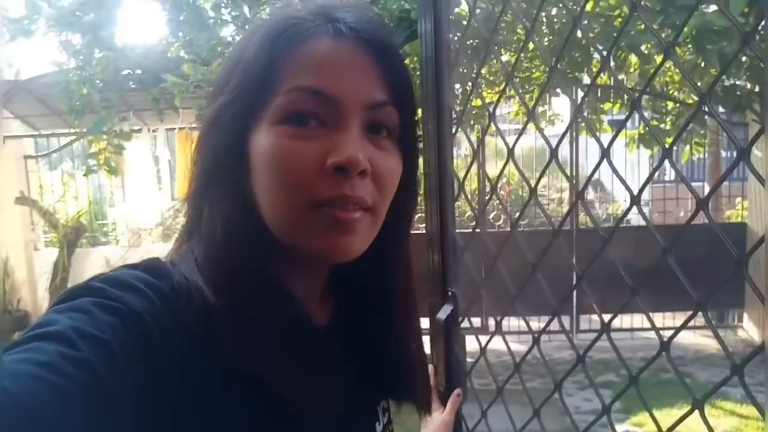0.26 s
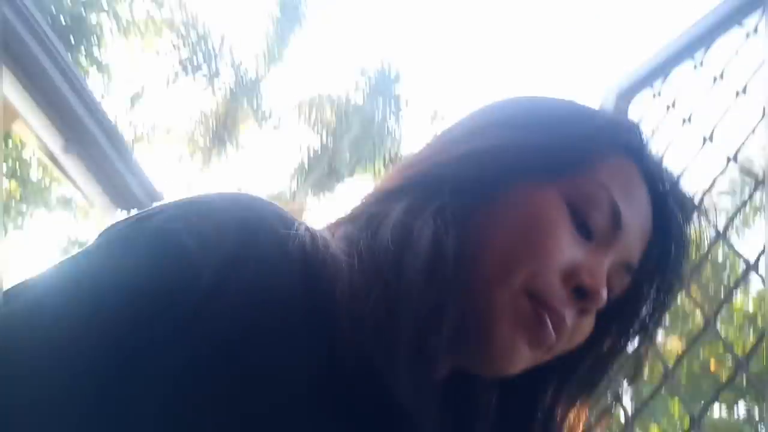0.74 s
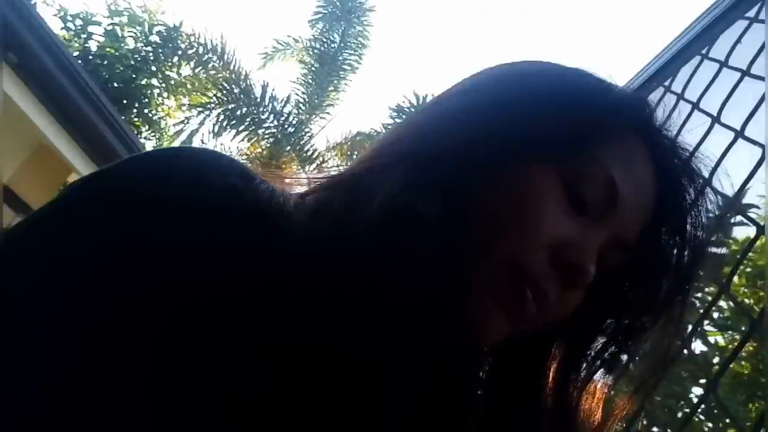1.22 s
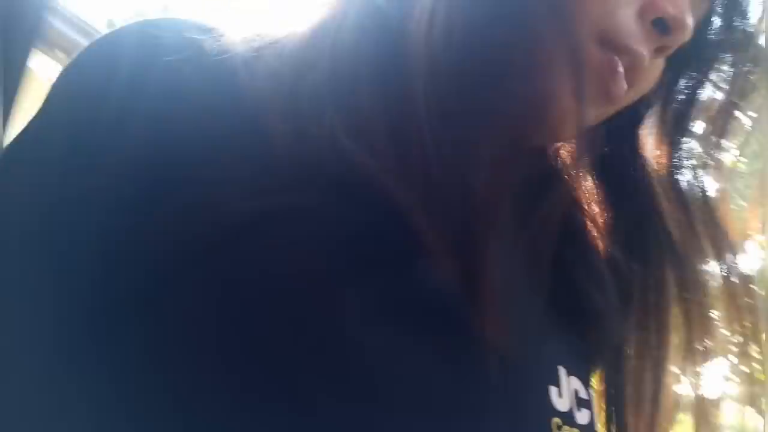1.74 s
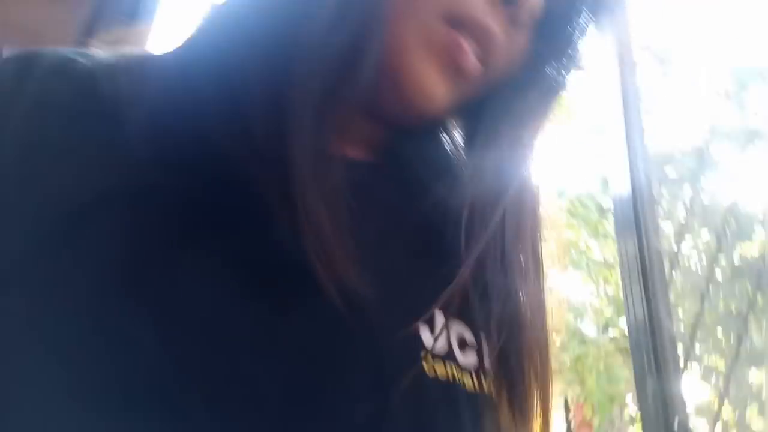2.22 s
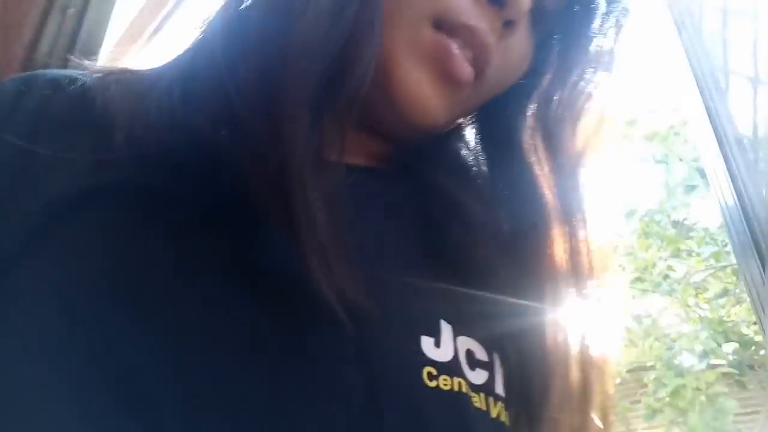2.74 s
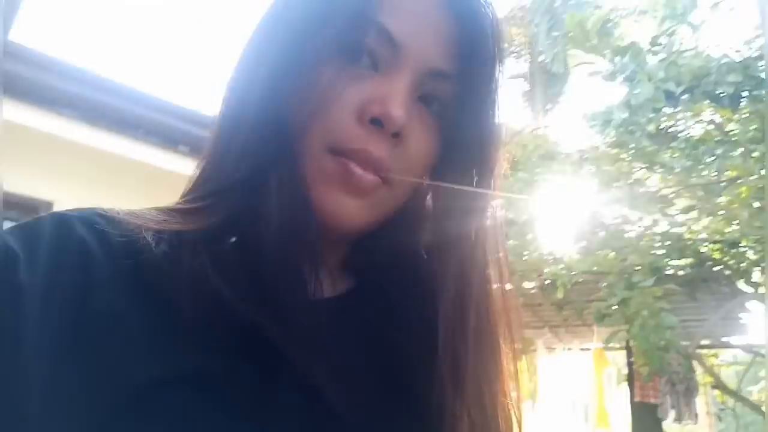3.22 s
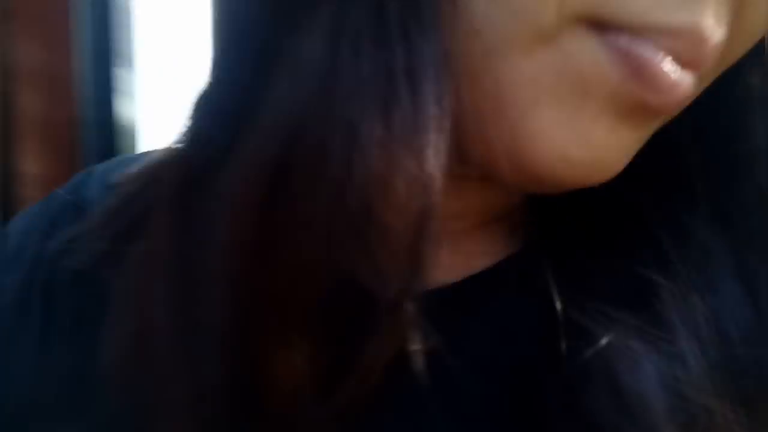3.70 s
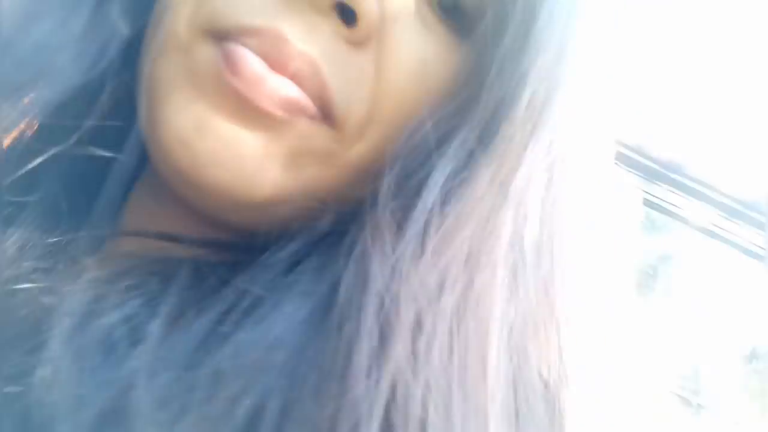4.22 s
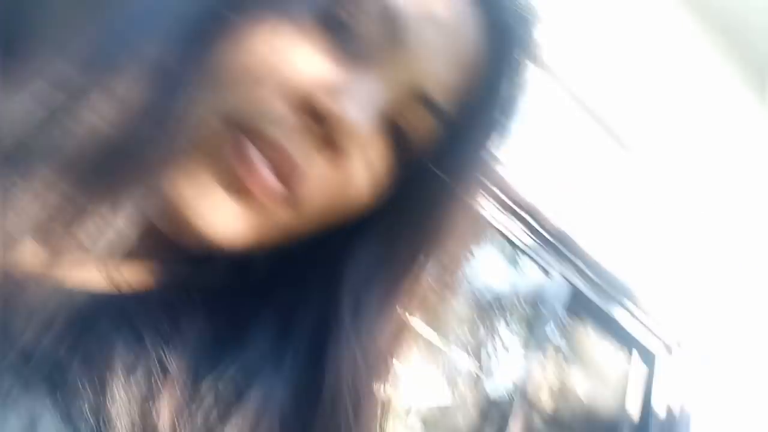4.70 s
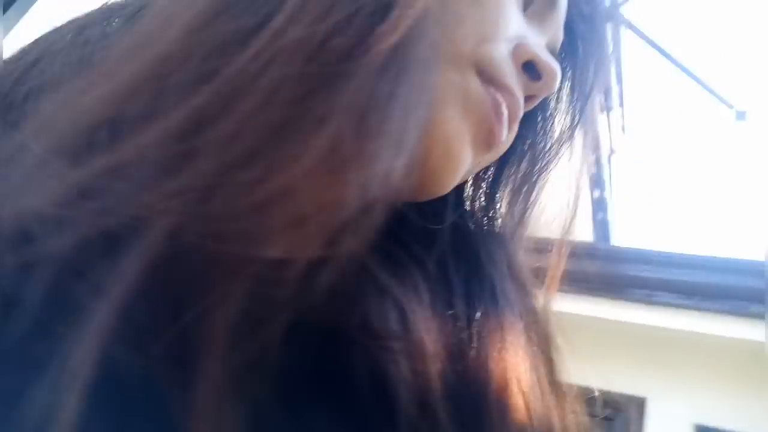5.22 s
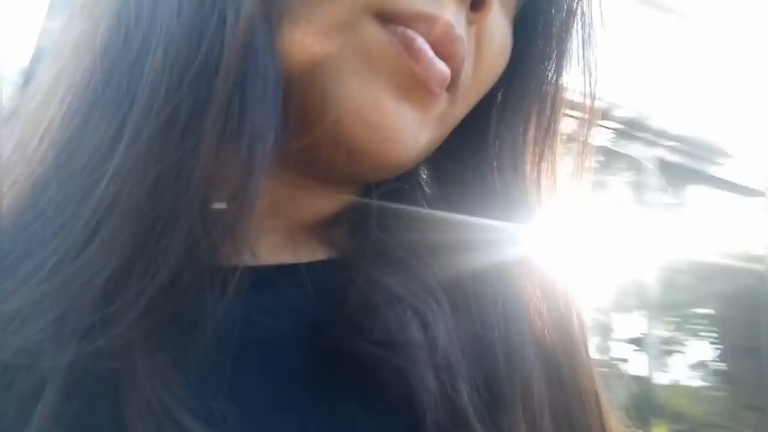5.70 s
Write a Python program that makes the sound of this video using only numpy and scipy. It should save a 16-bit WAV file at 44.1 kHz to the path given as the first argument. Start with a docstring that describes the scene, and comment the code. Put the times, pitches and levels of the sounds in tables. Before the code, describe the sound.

In a yard, a sleeve rubs close to a handheld phone and a hinge gives a thin, high squeak. A steel mesh gate then swings open with a loud, piercing squeal and ringing knocks of latch and frame. More squeals follow, fraying into rasps, and then shorter squeaks and clanks. Fingers tick sharply on the microphone, mostly on the left, over a faint low outdoor rumble.

```python
"""A yard, where someone holding a phone swings a steel mesh gate open.
Dry hinges stick and slip, squealing in near-pure tones that break up into rasps; latch and frame knock,
ring and hum, with a short echo off wall and paving. Up close, sleeve and hair rub and fingers tick on
the left microphone, over a low outdoor rumble. The phone's crude rate converter mirrors every squeal."""
import sys
import numpy as np
from scipy import signal
from scipy.fft import rfft, irfft, next_fast_len
from scipy.io import wavfile
from scipy.ndimage import map_coordinates

SR = 44100
rng = np.random.default_rng(int(sys.argv[2]) if len(sys.argv) > 2 else 0)


def to_wav(sig):
    """Store sig (one row per channel, or 1-D mono) as 16-bit WAV at the path in sys.argv[1].

    Samples outside -1..1 are clipped; the rate is SR.
    """
    pcm = np.clip(np.atleast_2d(sig), -1, 1) * 32767
    pcm = np.round(pcm).astype(np.int16)
    wavfile.write(sys.argv[1], SR, pcm.T)  # frames by channels


N = 262629
T = np.arange(N) / SR

# strokes of cloth and gate:
# (peak time [s], rise [s], fall [s], scrape level [dB], body over scrape [dB], hiss over scrape [dB])
RUB_STROKES = [(.115, 0.03, 0.076, -46, -35, -2), (.19, .03, 0.15, -35.5, -27, -7.5),
               (0.231, 0.03, 0.094, -35, -27, -7.5), (0.304, 0.062, 0.15, -43.5, 0, -24),
               (0.541, 0.056, 0.1, -45, -8.5, -2.5), (.8, 0.054, 0.069, -62.5, -11, 1),
               (1, 0.21, 0.19, -64, -30, 11), (1.263, 0.0091, 0.084, -51, -25, 8),
               (1.58, 0.056, 0.13, -51.5, -18, 5), (1.791, 0.019, 0.036, -48.5, -4, 11.5),
               (1.98, 0.086, 0.093, -48, -11.5, 8.5), (2.19, 0.068, 0.037, -48.5, 5, -21),
               (2.295, 0.027, 0.082, -55, -4, 4), (2.519, 0.025, 0.1, -49.5, -9, 3),
               (2.635, 0.033, 0.054, -44, -14, 0.5), (2.82, 0.2, 0.28, -59, -3.5, 10.5),
               (3.335, 0.14, 0.12, -49.5, -11.5, -21), (3.62, .04, .11, -53.5, -7, 0),
               (3.698, 0.057, 0.035, -53.5, -21, -17.5), (4.17, 0.39, 0.2, -57, -2, 1.5),
               (4.38, 0.15, 0.25, -72, 15.5, 10), (4.655, 0.057, 0.14, -61, 1, 8),
               (4.87, 0.065, 0.12, -52, 4.5, 9), (5.09, 0.15, 0.061, -54.5, -20, -14),
               (5.19, 0.078, 0.084, -47, -11, 9.5), (5.269, 0.075, 0.054, -48, 3.5, 2.5),
               (5.36, 0.056, .06, -61, 4, -2), (5.46, 0.047, 0.03, -49.5, -13, 5),
               (5.59, 0.14, 0.13, -63.5, -16, 20), (5.76, 0.11, 0.13, -58, 5.5, 7.5)]
# EQ curves of the three rubbing layers: (frequency [Hz], gain [dB])
BODY_EQ = [(120, -21), (250, 1), (500, -7), (850, -4.5), (1200, -30.5)]
SCRAPE_EQ = [(600, -9), (950, -4), (1250, 3.5), (1600, 8.5), (2100, 4), (2700, 2), (3500, 7)]
HISS_EQ = [(2100, -4.5), (2900, -2.5), (4400, 7.5), (5400, -1), (6300, -2), (7200, -22)]
# resonances of the steel gate: (frequency [Hz], bandwidth [Hz], gain [dB])
GATE_MODES = [(417, 40, -22), (523, 5, 3.5), (750, 5.7, 8), (1004, 9.5, 13.5), (1240, 49, -5),
              (1500, 78, -10), (1449, 39, 12), (1550, 6.2, 18), (1647, 34, 12), (1823, 42, 10),
              (1993, 37, 10.5), (2215, 48, 8), (2764, 4, 16.5), (2670, 47, -11), (3040, 10, 11),
              (3860, 31, -13), (4240, 110, -1), (4760, 450, -9.5), (5440, 300, -6)]
# EQ curve of the outdoor rumble: (frequency [Hz], gain [dB])
RUMBLE_EQ = [(20, -12), (40, -13.5), (65, -5), (95, -4), (130, 0), (180, -5.5), (260, -18.5), (450, -20)]
# low swells as the phone is carried about: (peak time [s], rise [s], fall [s], level [dB])
RUMBLE_SWELLS = [(.35, .05, 0.38, -64.5), (1.19, 0.15, 0.098, -60.5), (1.49, 0.12, 0.066, -61),
                 (2.17, 0.073, 0.068, -57), (2.6, 0.055, 0.019, -58), (2.85, 0.038, 0.074, -56),
                 (3.19, 0.19, 0.17, -57.5), (3.9, .07, 0.066, -59), (4.815, 0.012, 0.061, -43),
                 (5.24, 0.026, 0.12, -65.5), (5.9, 0.22, 0.21, -63)]
# short hinge squeaks; pan is always left minus right: (time [s], hold [s], t60 [s], start pitch [Hz],
# settled pitch [Hz], level [dB], roughness [0-1], pan [dB])
HINGE_SQUEAKS = [(0.302, 0.027, 0.19, 4812, 4757, -30.5, 0.09, 4),
                 (.305, 0.16, 0.11, 4040, 4040, -45.5, 0.22, 15),
                 (0.405, .085, 0.17, 4735, 4780, -37.5, 0.11, 6),
                 (2.04, 0.073, 0.11, 2640, 2710, -49, 0.87, 10),
                 (2.091, 0.048, 0.062, 2400, 2220, -48.5, 0.77, 9),
                 (2.922, 0.45, 0.6, 820, 783, -60, 0.31, 6),
                 (3.542, 0.0083, 0.11, 2874, 2720, -31.5, 0.32, 7.5),
                 (3.611, 0.045, 0.15, 2760, 2780, -40.5, 0.75, 10),
                 (4.095, 0.059, 0.069, 3403, 2755, -34.5, 0.56, 10),
                 (4.163, 0.009, 0.22, 2840, 2833, -30, 0.46, 13),
                 (4.68, 0.031, 0.17, 800, 811, -52.5, 0.3, 18),
                 (4.788, 0.064, 0.17, 3254, 3350, -44.5, 0.2, 4),
                 (5.358, 0.011, 0.19, 3124, 2720, -38.5, 0.37, 8),
                 (5.404, 0.022, 0.58, 2967, 2740, -37.5, 0.82, 10),
                 (5.44, 0.02, 0.6, 3090, 3056, -45.5, 0.52, 4),
                 (5.646, .11, 0.21, 882, 986, -40.5, 0.42, 13), (5.814, 0.1, 0.073, 3340, 3420, -50, 0, 23),
                 (5.86, 0.046, 0.17, 875, 832, -53, 0.9, 6)]
# breakpoints of the three long squeals: (time [s], pitch [Hz], level [dB], pan [dB])
LONG_SWING = [(1.697, 3270, -23, 13.5), (1.711, 3379, -25.5, 14.5), (1.817, 3360, -14.5, 22.5),
              (1.873, 3362, -19.5, 14), (1.887, 3304, -27, 12), (1.909, 3320, -30.5, 3),
              (1.929, 3232, -30, 12.5), (1.975, 3208, -39, 9), (1.997, 3047, -29.5, 15.5),
              (2.011, 2646, -31.5, 19), (2.045, 2630, -50, 11)]
SECOND_SWING = [(3.088, 3228, -36, 3), (3.104, 3205, -35, 8.9), (3.162, 3258, -21, 0.96),
                (3.198, 3245, -44, 1.1), (3.236, 3173, -33, 3.1), (3.276, 3146, -32.5, 15),
                (3.32, 3200, -46, 6.0)]
HIGH_SWING = [(3.655, 4754, -40.5, 3), (3.695, 4749, -38, 9), (3.725, 4771, -45, 0),
              (3.831, 4702, -36.5, -2), (3.871, 4747, -38.5, -8.5), (3.933, 4743, -31.5, -1.5),
              (3.955, 4737, -34, -2.5), (4.007, 4687, -28.5, 0.5), (4.045, 4720, -37, 12.5),
              (4.089, 4660, -38.5, -3.5), (4.141, 4692, -50.5, 9), (4.2, 4680, -65, -1)]
# voicing of each long squeal:
# (breakpoints [table], trim [dB], start roughness [0-1], end roughness [0-1], octave overtone [dB])
SWING_SQUEALS = [(LONG_SWING, 2.84, 0.043, 0.36, -30), (SECOND_SWING, 1, 0.086, 0.61, -6.5),
                 (HIGH_SWING, 3.06, 0.12, 0.4, -40)]
# toneless slips of the hinge: (time [s], length [s], start centre [Hz], end centre [Hz], level [dB])
HINGE_RASPS = [(0.593, 0.15, 6340, 5910, -46.5), (1.237, .12, 3900, 3300, -43.5),
               (3.283, 0.092, 4890, 3590, -43.5), (3.278, 0.093, 1800, 1192, -53),
               (3.579, 0.071, 4174, 3476, -38), (3.637, 0.1, 3483, 3145, -41.5),
               (4.61, 0.086, 4380, 3940, -48.5), (5.518, 0.13, 4095, 3784, -40.5)]
# hits of latch and frame:
# (time [s], level [dB], t60 [s], treble [dB], pan [dB], bar pitch [Hz], relative bar level [dB])
GATE_KNOCKS = [(0.659, -62, 0.059, 3, 9, 5800, 1), (1.257, -60, 0.3, 12, 18, 907, 4.5),
               (1.568, -43.5, 0.032, -10, 20, 1750, -27), (1.787, -27.5, 0.023, 16, 7, 5240, 2),
               (1.923, -34, 0.13, 11.5, 10, 1776, -11.5), (2.146, -47.5, 0.19, -10, 4, 1300, 9.5),
               (2.154, -32, 0.092, -22, 14, 1205, -2), (2.286, -48, 0.06, -2, 8, 1320, 6),
               (2.421, -46, 0.15, 12.5, 8, 1504, -9), (2.6162, -30, 0.078, 5, 6.5, 1567, -9),
               (3.408, -45, 0.078, 2, 12, 2520, 0), (4.45, -38.5, 0.3, 2.5, 16.5, 1285, -8.5),
               (4.58, -42, 0.16, 4.5, 15, 1770, -2), (4.843, -40, 0.11, -1, 12, 3370, -1),
               (4.98, -37, 0.1, 14.5, 11, 1600, -12), (5.192, -39.5, 0.29, 22, 8, 650, -7),
               (5.41, -38.5, 0.045, 17, 6, 4900, -1.5), (5.436, -35.5, 0.055, 13, 7, 1340, -3.5)]
# fingers on the phone: (time [s], tick peak [dB], tick centre [Hz], case thud over tick [dB])
FINGER_TAPS = [(2.056, -9, 3200, -6.5), (2.423, -30, 3900, -22), (2.5829, -24, 3380, -13),
               (4.3169, -15.5, 2380, -8.5), (4.58, -27, 6160, -10), (4.807, -15, 430, -25),
               (4.8357, -23, 1540, 3), (4.845, -24.5, 1450, 2), (5.1918, -21.5, 2170, 1),
               (5.2859, -20.5, 2640, -4.5), (5.7261, -15, 2570, -17)]
# dull hum of the jolted frame: (time [s], pitch [Hz], level [dB], t60 [s])
FRAME_HUMS = [(2.201, 238, -54, 0.61), (2.173, 333, -43, 0.15), (4.807, 282.3, -44, 0.43),
              (5.051, 334, -48.5, 0.1), (5.196, 366, -52.5, 0.83), (5.327, 290, -48.5, 0.35)]


def undb(db):
    """Decibels to gain."""
    return 10 ** (np.asarray(db) / 20)


def unit(x):
    """Scale to rms 1."""
    return x / np.sqrt(np.mean(np.abs(x) ** 2))


def pan(pan_db):
    """Left and right gains of mean power 1, for a still or moving pan."""
    gains = undb(np.array([pan_db, -pan_db]) / 2).reshape(2, -1)
    return unit(gains / np.sqrt(np.cosh(pan_db * np.log(10) / 10)))


def drift(rate_hz):
    """Smooth random modulation of rms 1, independent left and right."""
    hz = np.fft.rfftfreq(N, 1 / SR)
    return unit(irfft(rfft(rng.standard_normal((2, N))) * np.exp(-.5 * (hz / rate_hz) ** 2), N))


def equalise(x, curve):
    """Shape a signal with an EQ curve; rms 1."""
    size = next_fast_len(N, True)
    hz, db = np.transpose(curve)
    bins_hz = np.fft.rfftfreq(size, 1 / SR) + 1
    gain = undb(np.interp(np.log(bins_hz), np.log(hz), db, -90, -90))
    return unit(irfft(rfft(x, size) * gain, size)[..., :N])


def resonate(x, hz, width_hz):
    """Two-pole resonance with gain 1 at its centre."""
    g, k = np.tan(np.pi * hz / SR), width_hz / hz
    return signal.lfilter([g * k, 0, -g * k], [1 + g * k + g * g, 2 * (g * g - 1), 1 - g * k + g * g], x)


def add(out, s, x):
    """Mix a stereo sound in at time s."""
    i = int(s * SR)
    out[:, i:i + x.shape[1]] += x[:, :N - i]


def swell(peak_s, rise_s, fall_s, shape=1.14):
    """An envelope that rises to 1 and dies away; shape 1 is pointed, 2 is round."""
    return np.exp(-np.abs((T - peak_s) / np.where(T < peak_s, rise_s, fall_s)) ** shape)


def gate_ring(push, treble_db):
    """The steel gate rings at its modes when pushed; rms 1."""
    return unit(sum(undb(db + treble_db * (hz > 3500)) * resonate(push, hz, width)
                    for hz, width, db in GATE_MODES))


def rubbing(grain_db=3, grain_samples=32, flicker_db=1.5, snags_per_s=110, snag_db=16, mesh_db=-5):
    """Sleeve and hair rub in tiny slips and sharper snags: dull body, scrape, hiss, a faint mesh ring."""
    power = undb([[-67], [-70.5], [-59]]) ** 2  # constant bed of scrape, body and hiss
    for s, rise, fall, db, body_db, hiss_db in RUB_STROKES:
        power = power + (undb([[db], [db + body_db], [db + hiss_db]]) * swell(s, rise, fall)) ** 2
    scrape, body, hiss = np.sqrt(power)
    snags = (rng.random(N) < snags_per_s / SR) * rng.standard_normal((2, N)) * undb(snag_db)
    out = gate_ring(rng.standard_normal((2, N)), treble_db=-2) * undb(mesh_db) * scrape
    for curve, envelope, trim_db in ((BODY_EQ, body, -2), (SCRAPE_EQ, scrape, -.5), (HISS_EQ, hiss, -1)):
        grains = undb(grain_db * rng.standard_normal(N // grain_samples + 1))
        slips = rng.standard_normal((2, N)) * np.repeat(grains, grain_samples)[:N] + snags
        fader = undb(trim_db + flicker_db * drift(rate_hz=19.6)[0])
        out = out + equalise(slips, curve) * envelope * fader
    return out * pan(9)


def body_bounce(x, lag_s=0.001598, lag_swing=0.198, move_hz=1.605, bounce_db=-7):
    """One reflection off the holder, whose changing distance sweeps notches through the sound."""
    lag = lag_s * np.exp(lag_swing * drift(move_hz)[0])
    bounce = np.array([map_coordinates(channel, [(T - lag) * SR], order=1) for channel in x])
    return (x + undb(bounce_db) * bounce) / np.hypot(1, undb(bounce_db))


def echoes(x, t60_s, wet_db, predelay_s):
    """Add a tail of scattered reflections, different at each microphone."""
    t = T[:SR // 2]
    tail = rng.standard_normal((2, len(t))) * undb(-60 * t / t60_s) * (t > predelay_s)
    tail /= np.sqrt(np.sum(tail ** 2, axis=1, keepdims=True))
    return x + undb(wet_db) * signal.fftconvolve(x, tail, axes=1)[:, :N]


def rumble(bed_db=-71, trim_db=3.5):
    """A bed of low outdoor noise that swells and sinks as the phone is carried."""
    swell_power = sum((undb(db) * swell(s, rise, fall)) ** 2 for s, rise, fall, db in RUMBLE_SWELLS)
    envelope = np.sqrt(undb(bed_db) ** 2 + swell_power)
    air = rng.standard_normal((2, N)) + 1.35 * rng.standard_normal(N)  # mostly common to both sides
    return equalise(air, RUMBLE_EQ) * envelope * undb(trim_db) * pan(10)


def squeak_curves(attack_s=0.014, settle_s=0.054, octave_db=-17):
    """Controls for each short squeak: the hinge catches off pitch, settles on a resonance, rings out."""
    for s, hold, t60, start_hz, settled_hz, db, rough, pan_db in HINGE_SQUEAKS:
        span = (T > s) & (T < s + hold + t60)
        t = T[span] - s
        hz = settled_hz + (start_hz - settled_hz) * np.exp(-t / settle_s)
        gain = np.minimum(t / attack_s, 1) * undb(db - 60 * np.maximum(t - hold, 0) / t60)
        yield span, hz, gain, pan_db, rough, octave_db


def hinges(voices, grate_db=-5, flutter_db=2, full_flutter_roughness=0.46, mic_lag_s=.00004):
    """The pin sticks and slips at one resonance; as grip is lost the tone frays into a noise band."""
    out = np.zeros((2, N))
    scatter = unit(drift(rate_hz=95) + 1j * drift(rate_hz=95))
    grate = undb(grate_db) * unit(drift(rate_hz=420) + 1j * drift(rate_hz=420))  # wider, harsher fray
    flutter = flutter_db * drift(rate_hz=24)
    jitter = 3 * drift(rate_hz=32)[0]
    right_lag = mic_lag_s * (1 + drift(rate_hz=8.8)[0])  # wanders as the phone moves
    for span, hz, gain, pan_db, rough, octave_db in voices:
        cycles = np.cumsum(hz + jitter[span] * (1 + 8 * rough)) / SR
        tone = np.exp(2j * np.pi * (cycles - np.outer([0, 1], hz * right_lag[span])))
        octave = undb(octave_db) * (1 - rough) * tone ** 2
        grip = np.sqrt(1 - rough ** 2) + rough * (scatter[:, span] + rough * grate[:, span])
        looseness = np.minimum(rough / full_flutter_roughness, 1)
        envelope = gain * undb(flutter[:, span] * looseness)
        out[:, span] += (grip * (tone + octave)).imag * envelope * pan(pan_db)
    return out


def rasps(spread_hz=420):
    """Loose slipping: a broad resonance that sinks as the hinge slows."""
    out = np.zeros((2, N))
    scatter = drift(spread_hz) + 1j * drift(spread_hz)
    for s, length, start_hz, end_hz, db in HINGE_RASPS:
        n, i = int(length * SR), int(s * SR)
        sweep = np.exp(2j * np.pi * np.cumsum(np.linspace(start_hz, end_hz, n)) / SR)
        band = (scatter[:, i:i + n] * sweep).real
        add(out, s, band * signal.windows.tukey(n, .7) * undb(db) * pan(7))
    return out


def knocks(rattle_db=-14, crack_s=0.0018, attack_s=0.00018):
    """Each hit cracks and rattles the mesh, feeding the gate's modes; the struck bar adds its note."""
    out = np.zeros((2, N))
    t = T[:SR // 2]
    for s, db, t60, treble_db, pan_db, bar_hz, bar_db in GATE_KNOCKS:
        rattle = rng.standard_normal((2, len(t)))
        clatter = unit(resonate(rattle, 2800 * undb(treble_db / 2), width_hz=1700))
        bar = undb(bar_db) * np.sqrt(2) * np.sin(2 * np.pi * (bar_hz * t + rng.random((2, 1))))
        ring = (gate_ring(rattle, treble_db) + bar + undb(rattle_db) * clatter) * undb(-60 * t / t60)
        crack = clatter * np.exp(-t / crack_s)
        attack = 1 - np.exp(-t / attack_s)
        add(out, s, (ring + crack) * attack * undb(db) * pan(pan_db))
    return out


def squeal_curves(edge_s=.006, loosen_power=1.7):
    """Controls for each long squeal: grip loosens as the swing runs out, so the tone roughens."""
    for breakpoints, trim_db, rough_start, rough_end, octave_db in SWING_SQUEALS:
        times, *columns = np.transpose(breakpoints)
        start, end = times[0] - edge_s, times[-1] + edge_s
        span = (T > start) & (T < end)
        t = T[span]
        hz, db, pan_db = (np.interp(t, times, column) for column in columns)
        fade = np.minimum(np.minimum(t - start, end - t) / (2 * edge_s), 1)
        progress = (t - start) / (end - start)
        rough = rough_start + (rough_end - rough_start) * progress ** loosen_power
        yield span, hz, fade * undb(db + trim_db), pan_db, rough, octave_db


def finger_taps(case_hz=650, case_width_hz=550, pan_db=18):
    """Fingers tick right at the left microphone, each with a short thud of the case."""
    out = np.zeros((2, N))
    push = signal.unit_impulse(SR // 20)
    thud = resonate(resonate(push, case_hz, case_width_hz), case_hz, 3 * case_hz)
    for s, db, hz, thud_db in FINGER_TAPS:
        tick = resonate(resonate(push, hz, 2.6 * hz), hz, 0.52 * hz)
        tap = tick / np.abs(tick).max() + undb(thud_db) * thud / np.abs(thud).max()
        add(out, s, tap * undb([[db], [db - pan_db]]))
    return out


def frame_hums(attack_s=0.0048):
    """The heavy frame hums on one low note after a jolt."""
    out = np.zeros((2, N))
    t = T[:SR // 2]
    for s, hz, db, t60 in FRAME_HUMS:
        envelope = (1 - np.exp(-t / attack_s)) * undb(db - 60 * t / t60)
        add(out, s, np.sin(2 * np.pi * hz * t) * envelope * pan(10))
    return out


def scene(handling_trim_db=-1.07):
    """The mix: the gate echoes off wall and paving, the rubbing off arm and body; the rest stays dry."""
    squealing = np.sqrt(2) * hinges([*squeal_curves(), *squeak_curves()])
    gate = echoes(squealing + rasps() + knocks(), t60_s=0.26, wet_db=-16, predelay_s=0.025)
    handling = echoes(body_bounce(rubbing()), t60_s=0.069, wet_db=-7, predelay_s=0.00145)
    return gate + handling * undb(handling_trim_db) + frame_hums() + finger_taps() + rumble()


def record(dry, voice_band_hz=7000, converter_hz=47990, top_hz=12900):
    """A voice-band microphone whose converter holds samples, mirroring each tone about every 3.9 kHz."""
    voice = signal.sosfilt(signal.ellip(6, .5, 60, voice_band_hz, fs=SR, output="sos"), dry)
    # the timing error is a sawtooth at the difference of the two sample rates
    sawtooth = sum(np.sin(2 * np.pi * k * (converter_hz - SR) * T) / (np.pi * k) for k in range(1, 13))
    positions = T * SR + sawtooth * SR / converter_hz
    held = np.array([map_coordinates(channel, [positions], order=3) for channel in voice])
    return signal.sosfilt(signal.ellip(8, .2, 70, top_hz, fs=SR, output="sos"), held)


dry = scene()
out = record(dry)
to_wav(out)
```